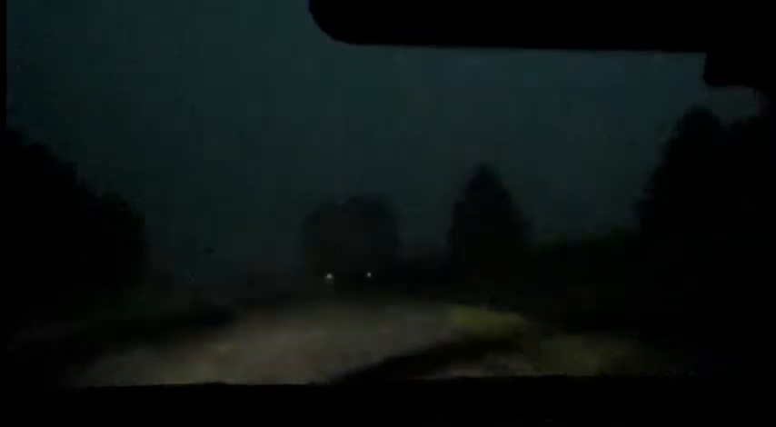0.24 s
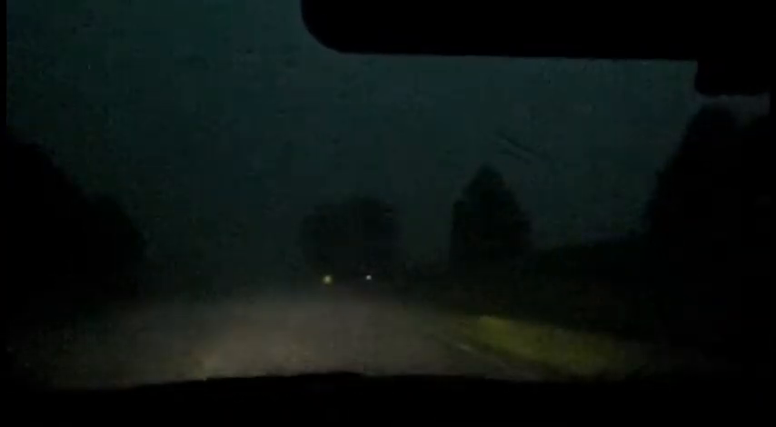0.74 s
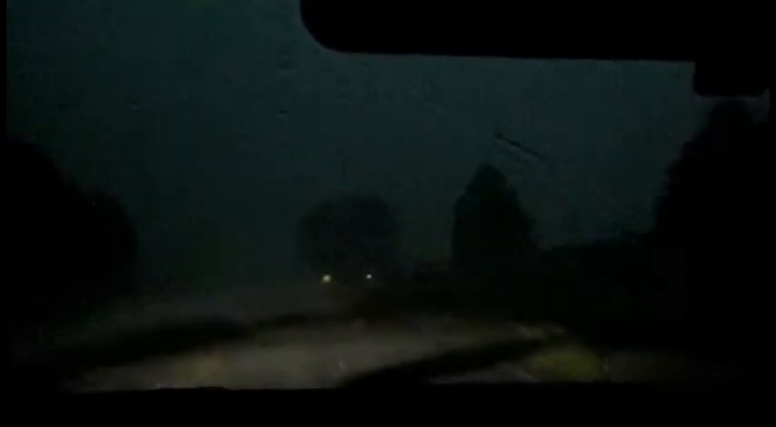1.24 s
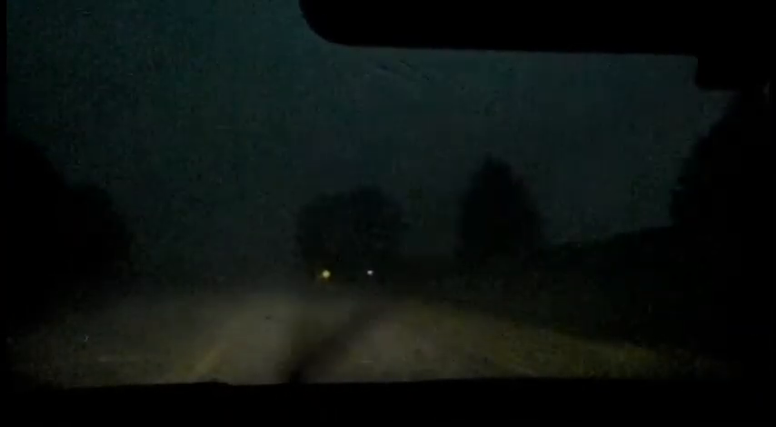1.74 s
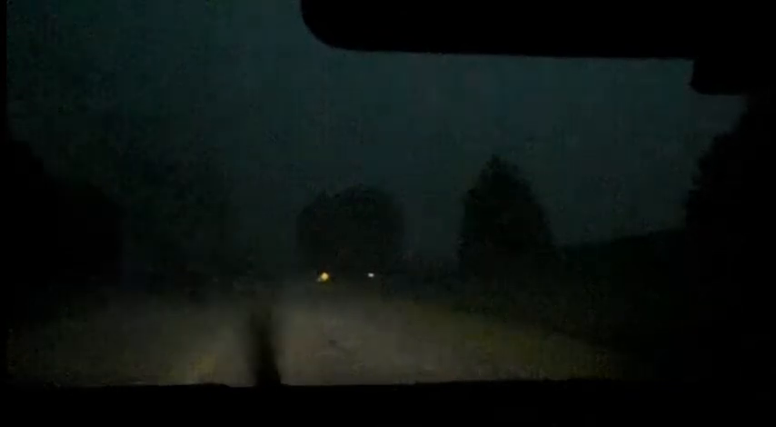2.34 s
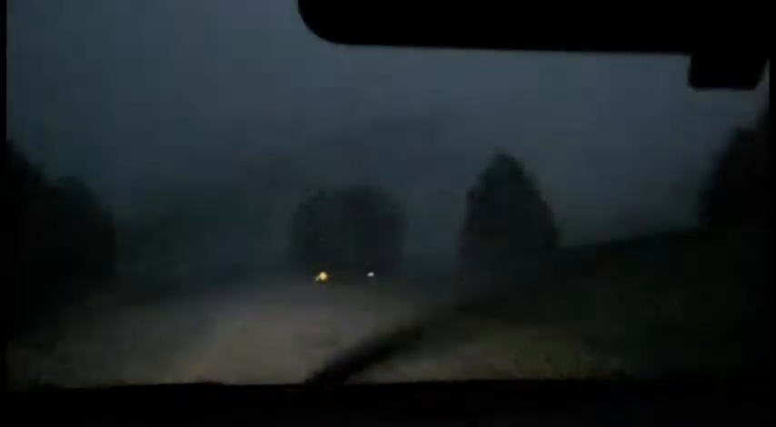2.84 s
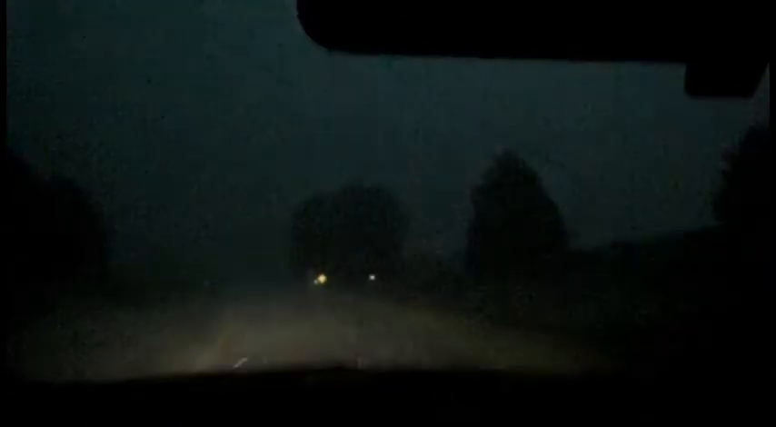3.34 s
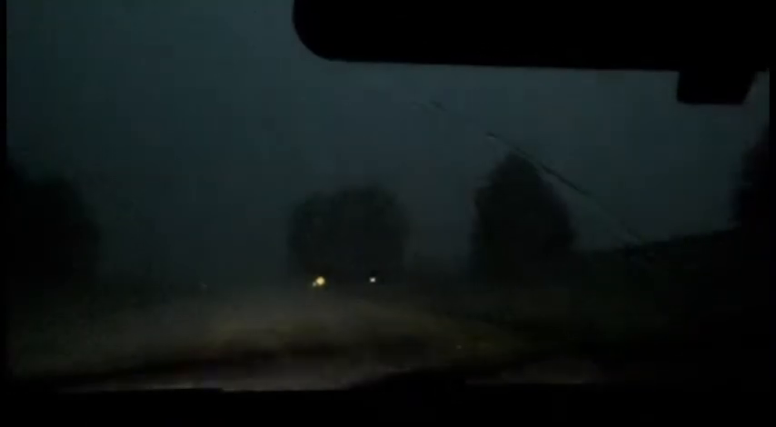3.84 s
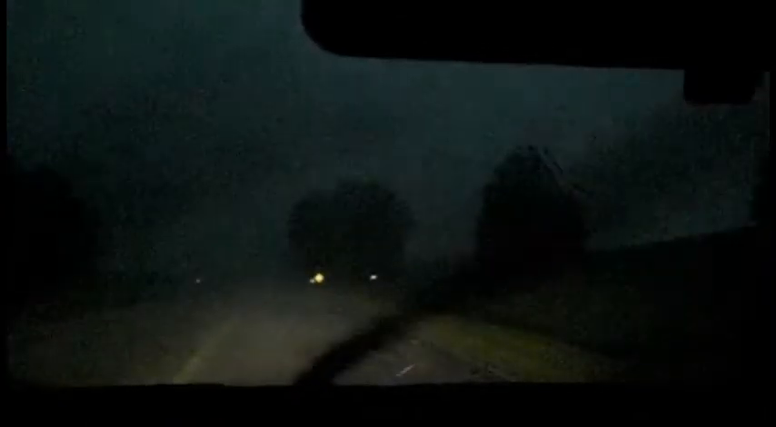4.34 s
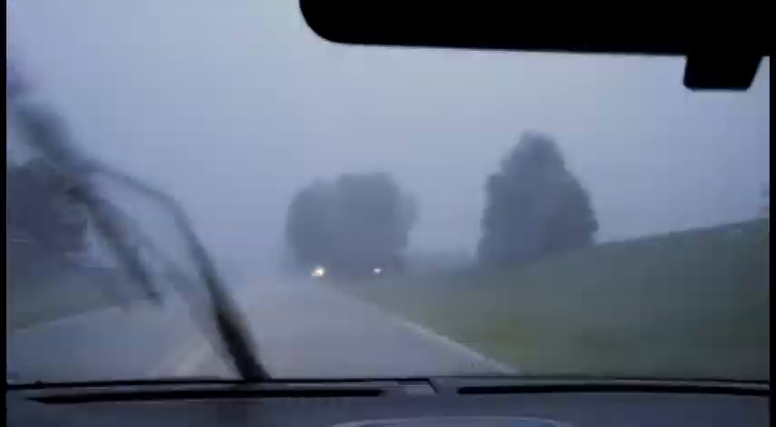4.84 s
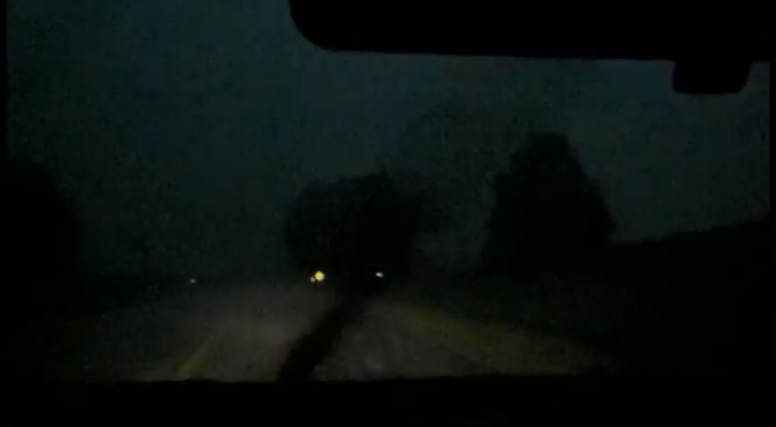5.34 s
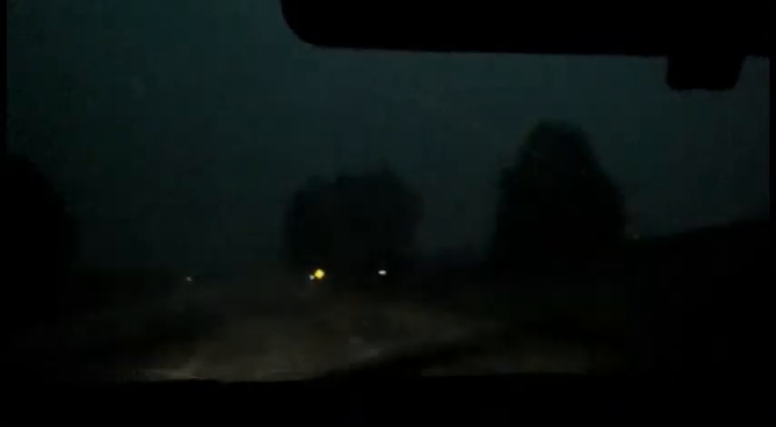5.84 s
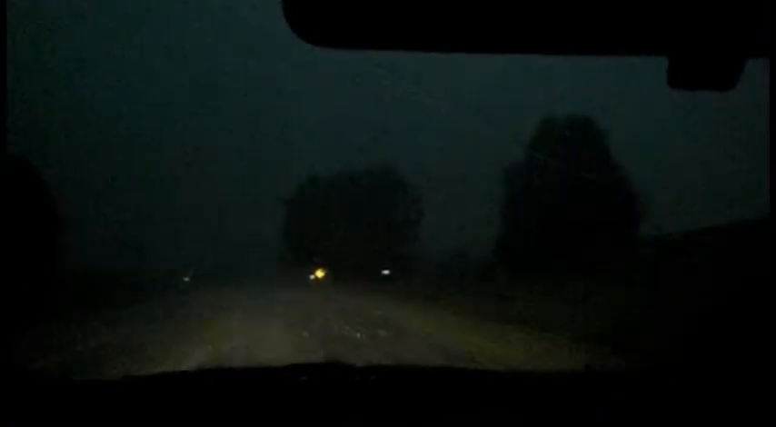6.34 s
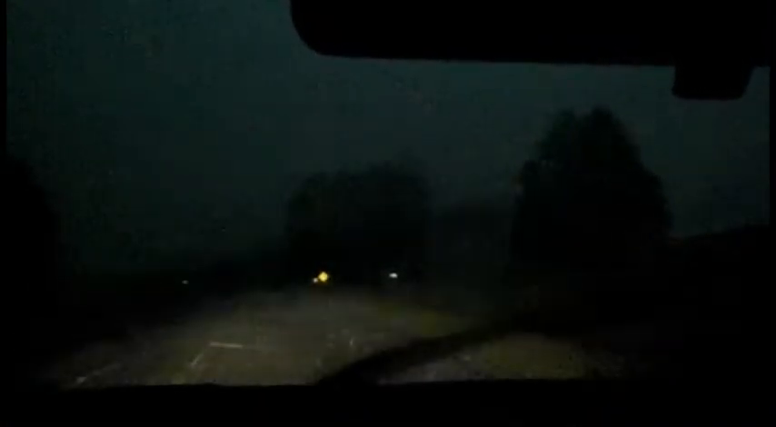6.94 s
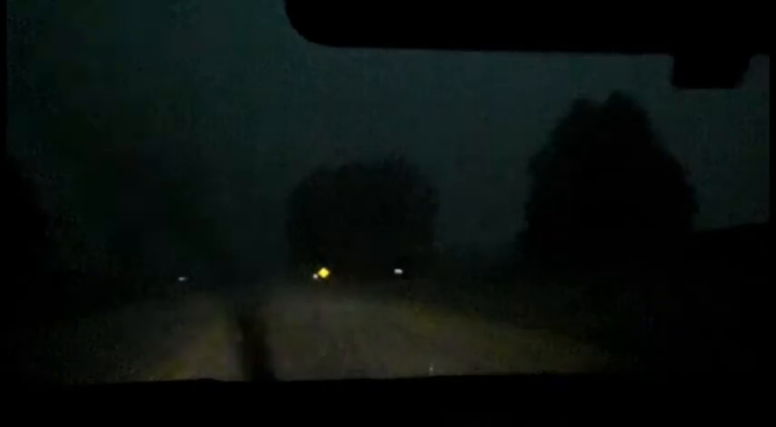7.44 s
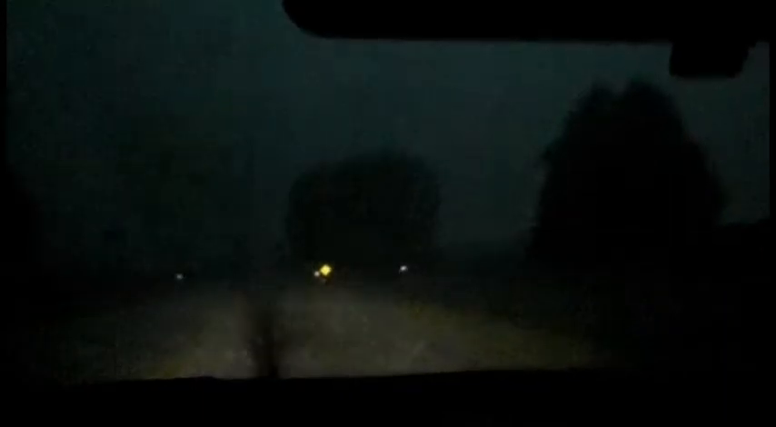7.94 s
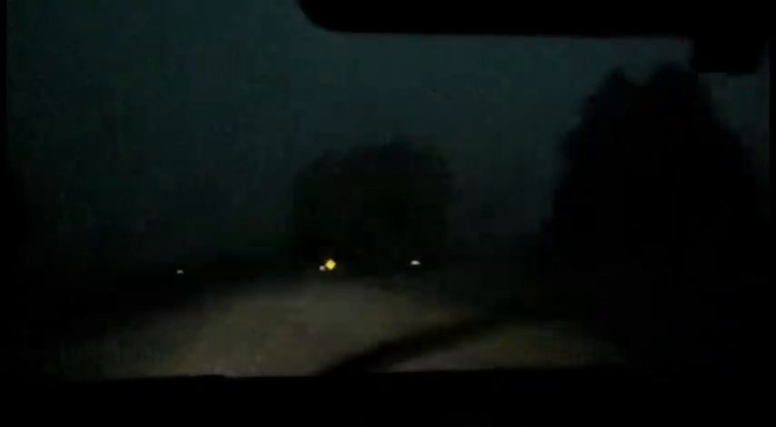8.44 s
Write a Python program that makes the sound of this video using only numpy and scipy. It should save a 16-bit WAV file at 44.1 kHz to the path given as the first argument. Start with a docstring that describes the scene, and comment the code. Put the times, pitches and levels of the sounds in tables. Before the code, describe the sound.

Inside the closed cabin of a slowly moving car in a hailstorm, heard by a small camera microphone behind the windshield. From 0 to 1.4 seconds hailstones fall in a dense, uneven flurry, small knocks and boomy thuds crowding together, with harder blows around 0.7, 0.9 and 1.2. Separate strong cracks follow near 1.6, 1.7, 2.2 and 2.5; around 3 the hits are mostly weaker. A very loud crack lands at 4.0, more at 4.4, 4.8 and 5.1, then a brief lull to 5.8. Spaced hits continue at 6.2, 6.6, 7.0 and 7.8, ending with two hard blows at 8.4 and 8.5. Glass and metal answer with short, differently pitched booms. Throughout, muffled flickering rain, dull pellet taps and a wavering low engine and road rumble, stronger toward the end. Loudest blows clip and briefly duck the level; treble is dull.

```python
"""Hailstorm on a slow car

Inside a car rolling slowly through a hailstorm, heard by a small camera behind the windshield.
Hailstones crack on glass and sheet metal: noise bursts and decaying sines, each panel booming at its own pitch.
Rain is flickering bands of noise, with dull taps of small pellets; engine and road are a wavering sine
and low resonant noise. The loudest blows overload the camera, whose gain sinks after them."""
import sys
import numpy as np
from scipy import signal
from scipy.io import wavfile
from scipy.ndimage import uniform_filter1d

SR = 44100
rng = np.random.default_rng(int(sys.argv[2]) if len(sys.argv) > 2 else 0)


def to_wav(sig):
    """Store sig (one row per channel, or 1-D mono) as 16-bit WAV at the path in sys.argv[1].

    Samples outside -1..1 are clipped; the rate is SR.
    """
    pcm = np.clip(np.atleast_2d(sig), -1, 1) * 32767
    pcm = np.round(pcm).astype(np.int16)
    wavfile.write(sys.argv[1], SR, pcm.T)  # frames by channels


N = 382788

# Resonances of the cabin air and panels. Each row: centre in Hz, width in Hz, gain in dB.
CABIN_MODES = [(81, 30, -4.5), (137, 55, 12), (245.5, 44, 13), (380, 120, -1.5), (604, 83, -33)]


def undb(db):
    """Level to amplitude: 20 dB are a factor of ten."""
    return 10 ** (np.asarray(db) / 20)


def unit(x):
    """Normalization to an rms amplitude of 1."""
    return x / np.sqrt(np.mean(x ** 2))


def ring(x, hz, width):
    """Second-order resonance with gain 1 at its centre; Q is centre over width."""
    return signal.lfilter(*signal.iirpeak(hz, max(hz / width, .3), fs=SR), x)


def rings(x, modes):
    """Modal superposition: several resonances side by side."""
    return sum(undb(db) * ring(x, hz, width) for hz, width, db in modes)


def walk(rate):
    """Slow random modulation: levels held 1 / rate s, smoothed by two moving averages."""
    hold = int(SR / rate)
    levels = np.repeat(rng.standard_normal(N // hold + 1), hold)
    return uniform_filter1d(uniform_filter1d(levels, hold), hold)[:N]


def burst(x, shape):
    """Energy-normalized burst: noise under an envelope, carrying exactly the energy of that envelope."""
    return unit(x * shape) * np.sqrt(np.mean(shape ** 2))


def follow(x, s):
    """Leaky integration of sound power with a time constant of s seconds."""
    keep = np.exp(-1 / (max(s, .005) * SR))
    return signal.lfilter([1 - keep], [1, -keep], x ** 2)


def rumble(hz):
    """Structure-borne sound: the engine throbs at a wavering pitch, the road excites a low resonance."""
    shake_hz, shake_width_hz = 34., 8.2
    phase = 2 * np.pi * np.cumsum(hz * (1 + 0.0608 * walk(8.3))) / SR
    throb = np.sin(phase) * undb(1.2 * walk(24.0))
    shake = ring(rng.standard_normal(N), shake_hz, shake_width_hz)
    shake = ring(shake, shake_hz, 4.4 * shake_width_hz)
    return unit(unit(throb) + 0.65 * unit(shake))


def rain():
    """Superposed random impacts: dense drops of uneven size heard through the roof, flickering by band."""
    # Spectrum of rain under the roof. Each row: frequency in Hz, relative level in dB per Hz.
    spectrum = [(26, -30), (45, -10), (69, 1), (190, -10.5), (258, -6.5), (419, -17.5), (683, -17.5),
                (1000, -31.5), (1570, -32.5), (2040, -47.5), (3680, -40.5), (5300, -58.5), (5750, -59.5),
                (7480, -93.5), (12700, -120)]
    hz_points, db_points = np.transpose(spectrum)
    out, gust = 0, walk(4.4)  # the gust moves all bands together
    for hz in 50 * 2 ** np.arange(0, 7.2, 1 / 3):  # third octaves
        drops = rng.standard_normal(N) * undb(1.4 * rng.exponential(size=N))
        db = np.interp(np.log(hz), np.log(hz_points), db_points)
        db = db + 0.5 * gust + 3.3 * walk(14.0)
        band = ring(ring(drops, hz, hz / 2.7), hz, hz / 2.7)
        out = out + undb(db) * band
    return unit(out)


def patter(per_s=24.0, size_db=5.0):
    """Random impulse excitation: small pellets and fat drops tap dully into the cabin resonances."""
    hits = (rng.random(N) < per_s / SR) * undb(size_db * rng.standard_normal(N))
    tail = rng.standard_normal(2000) * np.exp(-np.arange(2000) / SR / 0.049)
    taps = signal.fftconvolve(hits, tail)[:N]
    return unit(rings(rings(taps, CABIN_MODES), CABIN_MODES))


TICK_RISE_S = .0025  # the sharp tick peaks this long after its onset


def stone(boom_db, body_db, knock_db, tick_db, boom_hz, knock_hz, build_ms, t60):
    """Impact on a plate: treble sounds first, the heavier panel motion swells later and lasts longer."""
    # Ice on glass. Each row: resonance centre in Hz, width in Hz, gain in dB.
    crack_modes = [(3000, 590, 1), (3557, 480, 11), (3900, 1800, -38), (5300, 290, -2)]
    body_hz = 353.3
    knock_q = 4.  # pitch over width
    clack_db, clack_per_knock = -1, 0.36  # re crack, plus this share of the knock's dB
    boom_cycles = 53.1  # the diffuse boom fades 60 dB in this many cycles: deep panels roll on longer
    thud_cycles = 4.6  # the dent under the stone dies 60 dB within this many boom cycles
    panel_t60 = 0.17 + 0.54 * t60  # s, a fixed ring plus a share of the treble's
    spread = max(build_ms, .5) / 1000
    t = np.arange(int(.7 * SR)) / SR
    noise = rng.standard_normal((7, len(t)))

    def swell(late, t60_s):
        """Gradual build-up, then exponential decay."""
        return (1 - np.exp(-(t / (spread + late)) ** 1.5)) * 10 ** (-3 * t / max(t60_s, .03))

    def free(hz, t60_s):
        """Free vibration: a decaying sine with a soft onset."""
        return np.sin(2 * np.pi * hz * t) * (1 - np.exp(-t / 0.0003)) * 10 ** (-3 * t / t60_s)

    # the ice shatters
    tick = undb(tick_db) * np.minimum(t / TICK_RISE_S, 1) * np.exp(-t / 0.003)
    # splinters and loose trim make the treble tail ragged
    ragged = undb(0.63 * unit(ring(noise[6], 60., 120.)))
    crack = burst(rings(noise[0], crack_modes), 0.33 * ragged * swell(0., t60) + .5 * tick)

    clack = ring(ring(noise[5], 1400.0, 1900.), 1400.0, 1900.)
    clack = burst(clack, 0.32 * ragged * swell(0.00061, 0.74 * t60) + 0.077 * tick)

    knock = unit(ring(noise[1], knock_hz, knock_hz / knock_q))
    knock = knock + 0.72 * unit(ring(ring(noise[1], 1000., 960.0), 1000., 960.0))
    knock = burst(knock, .5 * swell(0.0053, 1.144 * t60) + 0.52 * tick)
    knock = knock + 0.23 * undb(tick_db) * free(knock_hz, 0.044)

    body = unit(ring(noise[2], body_hz, 60.0))
    body = body + 2.8 * unit(ring(ring(noise[2], 480., 460.0), 480., 460.0))
    body = burst(body, 0.82 * swell(0.0047, panel_t60) + 0.12 * tick)
    body = body + 0.23 * free(body_hz, 0.23)

    # the struck panel rings freely at its pitch; its neighbours and the cabin air answer more diffusely
    panel = 0.57 * free(boom_hz, .45 * panel_t60)
    rolling = 0.62 * np.sin(2 * np.pi * boom_hz * t) * swell(0.0045, .7 * panel_t60)
    thud = .8 * free(boom_hz, thud_cycles / boom_hz)
    answer = unit(ring(noise[3], boom_hz, 27.0)) + 0.41 * unit(rings(noise[4], CABIN_MODES[:3]))
    answer = burst(answer, 0.86 * swell(0.00061, boom_cycles / boom_hz))
    boom = panel + rolling + thud + answer

    blow = crack + undb(clack_db + clack_per_knock * knock_db) * clack
    return blow + undb(knock_db) * knock + undb(body_db) * body + undb(boom_db) * boom


def hail():
    """Linear superposition: every stone's blow is added at its moment."""
    # Hailstones. Each row: time of the tick's peak in seconds, gain of the whole blow in dB,
    # boom, body, knock and tick settings in dB re crack, boom pitch in Hz, knock pitch in Hz,
    # build-up in ms, treble decay by 60 dB in seconds.
    stones = [(0.157, -23, -3, -6.5, 7, -2.5, 262, 600, 15, 0.27),
              (0.2268, -34.5, 12, 5, -3.5, 13, 174, 566, 10, 0.15),
              (0.2798, -20.5, 14.5, 12, -8, 11, 324, 530, 11.3, 0.18),
              (0.4645, -29, -4, -4, 4.5, 0.5, 235, 690, 4.5, 0.35),
              (0.5306, -28.5, -4, 18.5, -5, 12, 360, 650, 5.3, 0.15),
              (0.5444, -36.5, 32.5, 18, 1.5, 3, 247.7, 650, 35, 0.31),
              (0.5793, -26.5, 8.5, 20.5, 23, -3, 284, 734, 29, 0.12),
              (0.6364, -31.5, 12, 19.5, -3, 7, 201, 653, 2.2, 0.12),
              (0.6605, -40, 24.5, 27, 6, -2, 148, 660, 5, 0.13),
              (0.7032, -12, -19, 4, -17, -12, 118.6, 680, 22, 0.19),
              (0.8026, -21.5, 16.5, 17.5, -5, 12, 126.6, 524, 16, 0.2),
              (0.8599, -9.5, 2.5, 0, -8, -6, 151, 690, 5.2, 0.24),
              (1.0021, -22.5, -10, -23, -9, 12, 290, 501, 2.6, 0.22),
              (1.1208, -32, 9, 8.5, 16.5, 10.5, 156, 670, 2.5, 0.099),
              (1.1515, -23, -2.5, 5, 11, -17, 245, 930, 2.8, .28),
              (1.1902, -15.5, 4, 5.5, 8.5, -1, 271, 700, 8.8, 0.43),
              (1.2432, -9, 1, -22, 3.5, 4, 124.4, 610, 1.9, 0.34),
              (1.351, -25.5, -8, -23, 8, 7, 110, 520, 5.6, 0.2),
              (1.6097, -13, -5.5, -2.5, 2, 6, 219, 503, 1.1, 0.28),
              (1.7158, -15, 1.5, 4.5, -6.5, 0, 141.4, 568, 4.7, 0.28),
              (1.941, -20.5, 9, 14.5, 12.5, 21, 253, 899, 15, 0.18),
              (2.076, -16.5, 0.5, -5, 1.5, -1, 200, 700, 11.5, 0.29),
              (2.1795, -9.5, -0.5, 2, -7, -20, 171.6, 510, 15.6, 0.16),
              (2.2525, -42.5, 29, 17, -4, 13, 273, 619, 14, .16),
              (2.4778, -14, 7.5, 3, -12, 4, 131.5, 580, 8.6, 0.2),
              (2.5308, -17, 6.5, -0.5, -16, 3, 145.4, 503, 9.4, .21),
              (2.597, -42.5, 15, 14, -5, 14, 108.5, 620, 6.6, 0.24),
              (2.9031, -29.5, 10, 11.5, 11.5, 8, 109.6, 870, 11.5, 0.41),
              (3.0101, -38.5, 16, 0.5, 18, -2, 152, 1160, 2.8, .19),
              (3.232, -33.5, 10, -3, -9, 11, 115, 560, 4.9, 0.22),
              (3.2597, -30.5, 19.5, 15, 17.5, -8, 207.5, 1030, 2.6, 0.25),
              (3.3937, -18.5, -22.5, -22, 2.5, -11, 302, 1166, 9.4, 0.25),
              (3.5635, -36, -22, 14.5, 7.5, 7.5, 293, 487, 1.5, 0.46),
              (3.6606, -32.5, 14.5, 21.5, 16.5, -3, 105.6, 645, 10.7, .15),
              (3.9927, -21.5, -19, -5, 1.5, 17.5, 83.4, 506, 4, 0.35),
              (4.0354, -5.5, -11.5, -15, -1, -24, 128, 1280, 3.2, 0.24),
              (4.1678, -29.5, 1, 21.5, -0.5, 6, 86, 496, 5.2, 0.28),
              (4.4445, -15, -9, -5, -1.5, 0, 191, 1255, 5.1, 0.25),
              (4.785, -8.5, -19.5, -16, -2.5, -3, 331, 1300, 14, 0.22),
              (4.8474, -16.5, 1.5, 7, 6, -3, 169.3, 517, 8, 0.15),
              (4.8755, -34, 21, 18.5, -2, 9, 156, 540, 7.9, 0.092),
              (4.97, -47.5, 26.5, 10, 4, -9, 152, 540, 44, 0.16),
              (5.1017, -7.5, -7.5, -7, 2.5, 15, 277, 863, 15, .19),
              (5.6, -51, 4, 3, 7, 17, 80.7, 486, 3.3, 0.38), (5.809, -25, 0, 9, 1, 9, 244, 1060, 12, 0.4),
              (6.2046, -11, -11, -8.5, -10, 1, 239, 522, 4.3, 0.21),
              (6.213, -25, 19, 6, 2, -8, 159.7, 514, 3, .12),
              (6.5566, -35, 13, 2, -2, 12, 118, 576, 6.3, 0.25),
              (6.6121, -13, -19, -3, 1, 12.5, 129, 820, 1.8, 0.21),
              (6.978, -13, 3.5, -8, 4.5, -28, 168, 636, 23, 0.19),
              (7.2341, -22.5, -10, 1, 2.5, 3, 335, 670, 9.6, 0.35),
              (7.5932, -28.5, 8, -0.5, 14, -11, 80.7, 940, 2.1, 0.17),
              (7.7548, -15, -5, 2, 7.5, -7.5, 104, 670, 5.4, .26),
              (8.025, -39, -8, -16, 8.5, 10, 94, 690, 2.5, 0.57),
              (8.1303, -14.5, -31, 7, 5, -1, 110, 790, 13.4, 0.3),
              (8.3568, -8.5, 0, -5.5, 0.5, 0, 250, 650, 3.7, 0.24),
              (8.495, -9, -12, -3.5, 0, -3.5, 100, 930, 21.5, 0.23)]
    out = np.zeros(N + SR)
    for s, db, *blow in stones:
        x = undb(db) * stone(*blow)
        start = int((s - TICK_RISE_S) * SR)
        out[start:start + len(x)] += x
    return out[:N]


def scene():
    """Sum of sources: hail over rain, patter and rumble; the roof's drumming swells after loud blows."""
    # Course of the storm. Each row: time in seconds, rain level in dB before the swelling,
    # throb pitch in Hz before its wavering, level of engine and road in dB.
    storm = [(0, -25, 36.64, -27), (0.8, -22.5, 37.9, -34), (1.5, -27.5, 33.5, -31.5),
             (2.3, -26.5, 33.95, -29.5), (3.4, -28.5, 32.73, -38), (3.9, -27, 32.96, -24.5),
             (4.2, -28, 32.94, -32.5), (4.7, -29, 32.9, -24.5), (5.4, -31, 34.3, -30),
             (6.3, -27, 34.3, -22.5), (7.3, -28.5, 34.54, -26.5), (8.68, -22.5, 36, -19.5)]
    patter_db = -11.5  # re rain
    linger_db, linger_s = -20, 0.076  # the roof drums on: level re hail, time constant of its power
    s, *columns = np.transpose(storm)
    t = np.arange(N) / SR
    rain_db, throb_hz, rumble_db = (np.interp(t, s, c) for c in columns)
    drum, taps, throb, blows = rain(), patter(), rumble(throb_hz), hail()
    roof = np.sqrt(undb(rain_db) ** 2 + undb(linger_db) ** 2 * follow(blows, linger_s))
    return (blows + roof * (drum + undb(patter_db) * taps) + undb(rumble_db) * throb)[None]


def record(dry):
    """Nonlinear transmission: gain sinks after loud blows, the input saturates, the top is cut steeply."""
    knee_db, gain_s, gain_slope = -7, 0.18, 0.1  # automatic gain: onset level, memory, dB cut per dB
    overload = .56  # amplitude that the soft clipping approaches
    spill_hz, leak_hz = 5600, 9700  # spill is kept above the first, everything is cut above the second
    dry = dry * (1 + follow(dry, gain_s) / undb(knee_db) ** 2) ** (-gain_slope / 2)
    loud = dry / (1 + np.abs(dry / overload) ** 6) ** (1 / 6)
    dull = signal.sosfilt(signal.butter(2, 4300., fs=SR, output="sos"), loud)
    preamp = undb(-58.5) * rng.standard_normal(N)  # hiss of the microphone amplifier
    steep = signal.cheby2(8, 60, 1.305 * spill_hz, fs=SR, output="sos")  # 60 dB down from this edge
    cut = signal.sosfilt(steep, dull + preamp)
    # a bent later stage spills a trace above the cut: rectification makes harmonics
    spill = signal.sosfilt(signal.butter(4, spill_hz, "highpass", fs=SR, output="sos"), np.abs(cut))
    hiss = undb(-90) * rng.standard_normal(N)
    last = signal.ellip(8, .5, 50, leak_hz, fs=SR, output="sos")
    return signal.sosfilt(last, cut + undb(-23.5) * spill + hiss)


dry = scene()
out = record(dry)
to_wav(out)
```